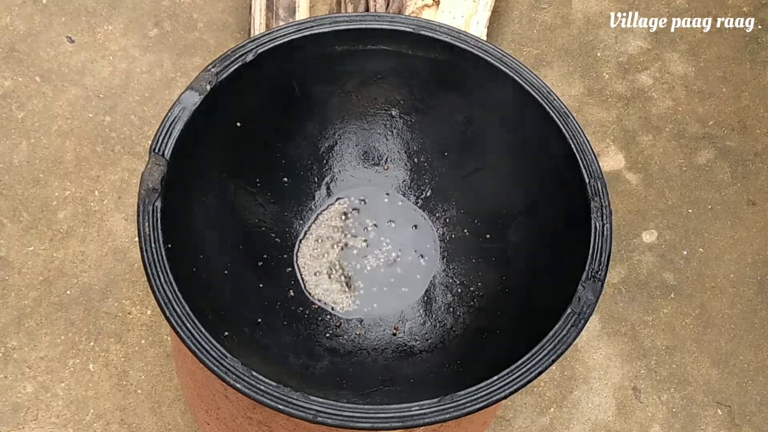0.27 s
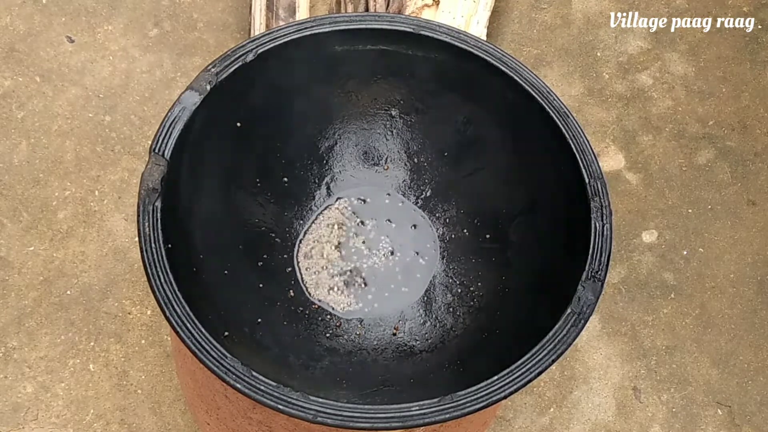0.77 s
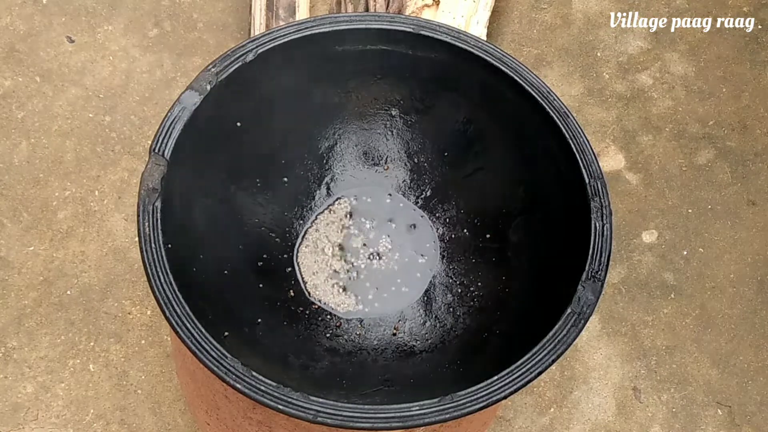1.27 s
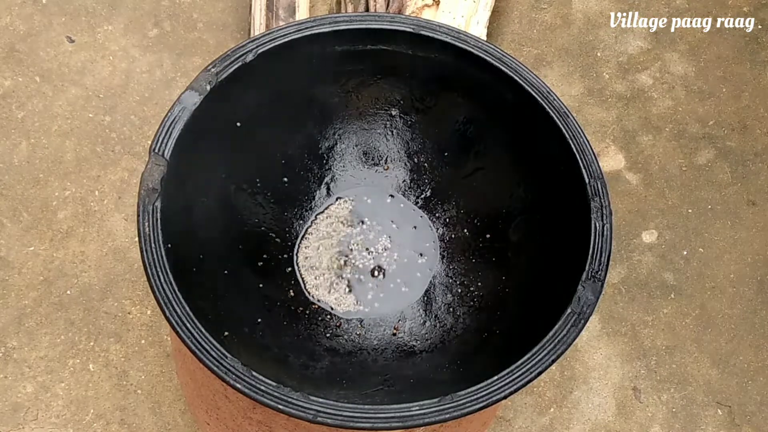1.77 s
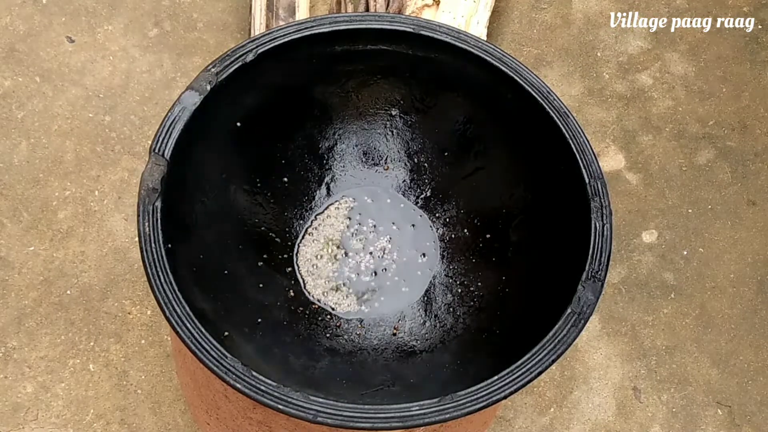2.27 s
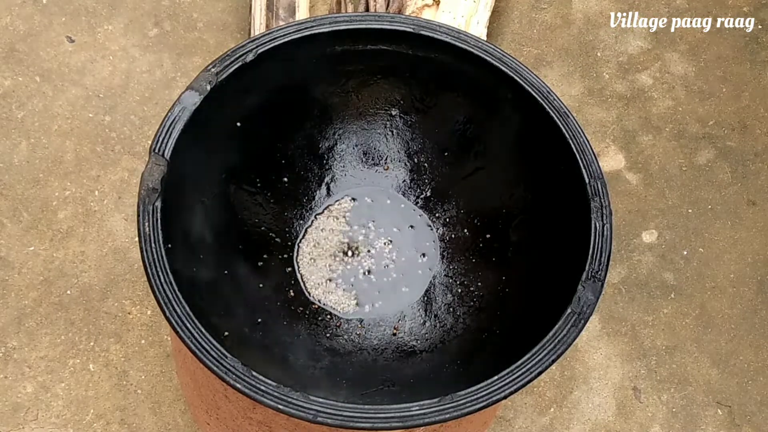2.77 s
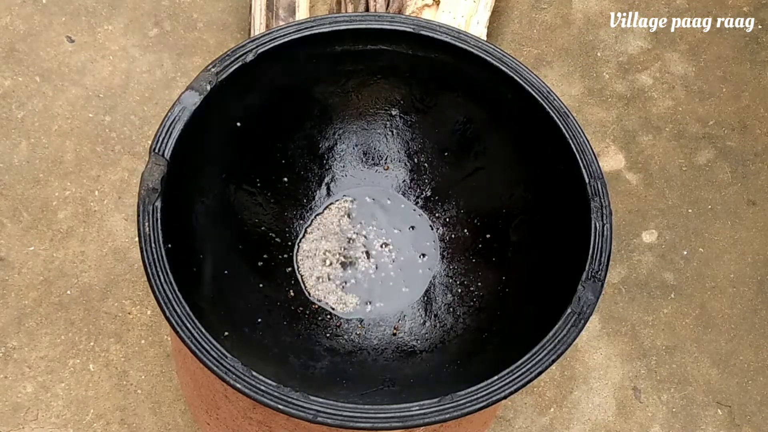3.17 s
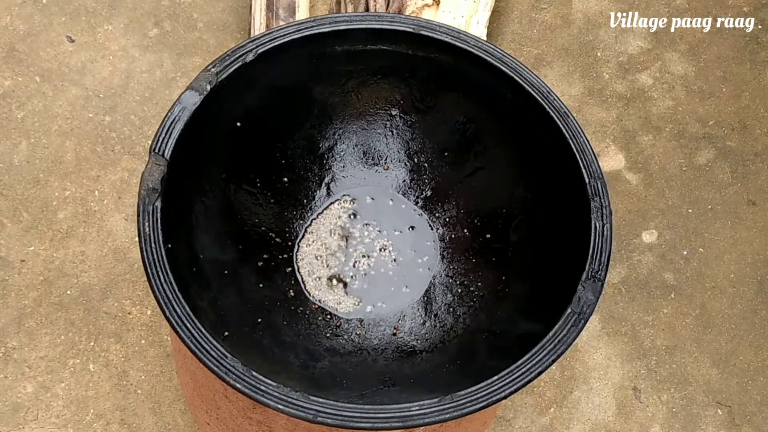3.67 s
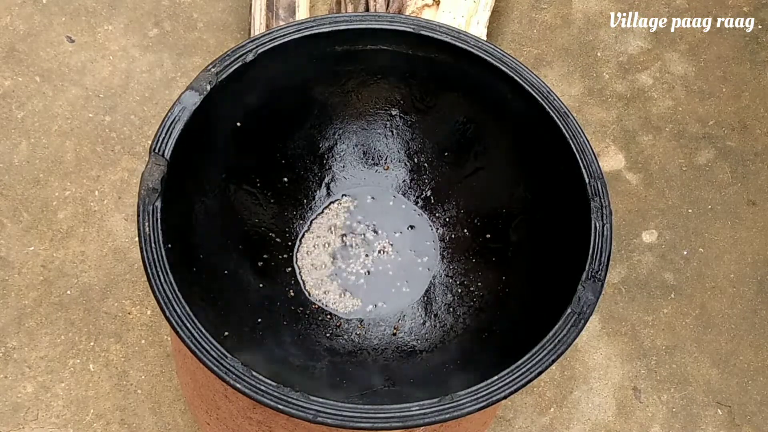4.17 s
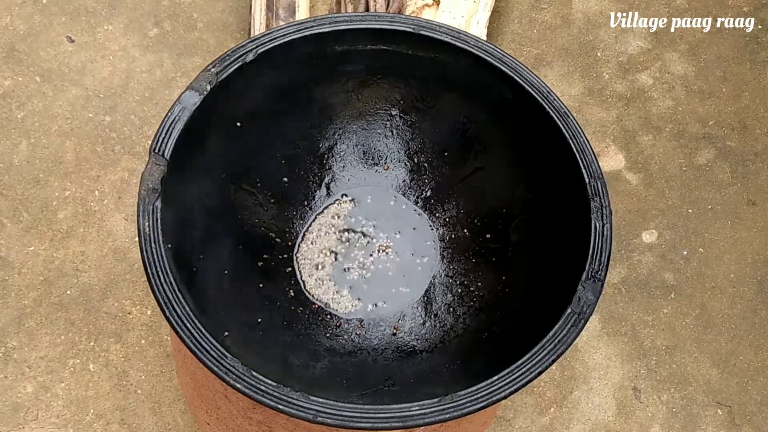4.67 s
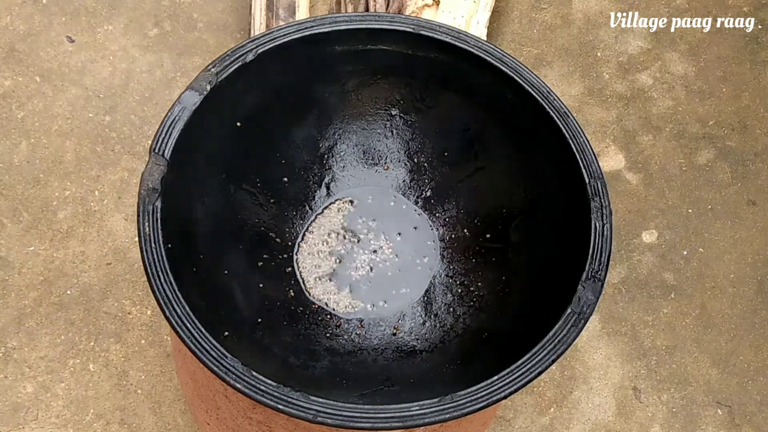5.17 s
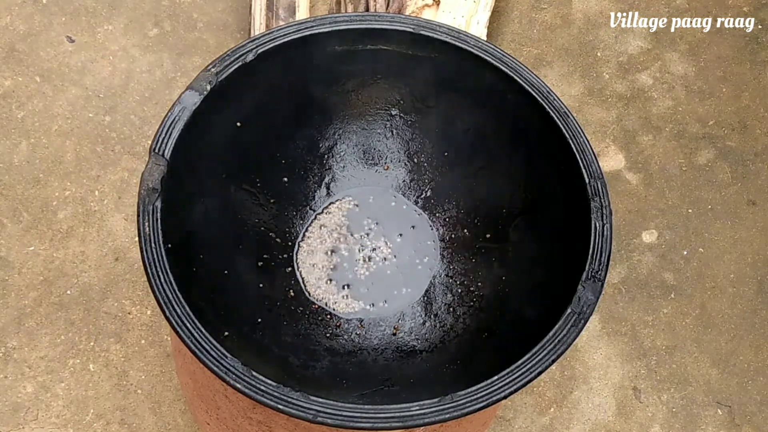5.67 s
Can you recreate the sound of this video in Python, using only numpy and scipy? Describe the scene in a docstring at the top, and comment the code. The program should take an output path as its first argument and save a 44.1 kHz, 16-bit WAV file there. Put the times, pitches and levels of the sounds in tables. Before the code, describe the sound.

Outdoors, with stereo microphones close above a deep iron pan, seeds burst in hot oil. A very quiet, airy high hiss of oil flickers throughout over soft low rumble and a faint, slightly wavering distant motor hum. A sharp pop comes almost at once, a small one follows, then a tight cluster at 0.5 s and one near 0.8 s. From 1.2 to 1.65 s brighter, stronger snaps crowd irregularly. After a gap, three burst around 2.3-2.4 s, a pair at 2.9 s, and an especially loud ringing one at 3.1 s. Another strong pop lands near 3.9 s amid weaker ones. Each burst is only milliseconds long, a dry crack with a short hollow metallic ping around 2-3 kHz and a diffuse yard tail. Tiny ticks fall between. Weaker pops continue to 4.6 s, then just a faint tick at 5.05 s and a small pop at 5.8 s.

```python
"""Oil hisses in an iron pan from the start (coloured noise), over soft outdoor rumble and distant motor hum.
Seeds soon burst in the oil, singly and in clusters: a noise puff rings the pan's hollow and wall as damped
modes, a snap with a bowl echo gives the crack, and noise tails return it from the yard.
From about 1 s, small ticks and thumps (decaying cosines) fall among the bursts; bursts get sparse towards the end.
Two microphone ports above the pan each add their own colour."""
import sys
import numpy as np
from scipy import signal
from scipy.fft import rfft, irfft
from scipy.io import wavfile
from scipy.ndimage import uniform_filter1d

SR = 44100
rng = np.random.default_rng(int(sys.argv[2]) if len(sys.argv) > 2 else 0)


def waveform_to_disk(signal):
    """Save audio, clipped to [-1, 1], as 16-bit WAV at the path in sys.argv[1]."""
    frames = np.transpose(np.atleast_2d(signal))
    scaled = np.clip(frames, -1, 1) * 32767
    samples = np.round(scaled).astype(np.int16)
    wavfile.write(sys.argv[1], SR, samples)


N = 261513

# oil hiss level: start_s, level_db
HISS_LEVEL = [(0.0, -61.5), (0.7, -65.5), (1.46, -59.5), (1.86, -63), (2.84, -63), (3.09, -60), (3.6, -64),
              (5.93, -64.5)]
# oil hiss spectrum: freq_hz, density_db_per_hz
HISS_SPECTRUM = [(1200, -13.5), (2500, -10.5), (7000, -8), (9000, -4), (11500, -1.5), (14000, -3),
                 (14500, -42)]
# outdoor rumble spectrum: freq_hz, density_db_per_hz
AIR_SPECTRUM = [(10, -13.5), (25, 8), (95, -1), (200, -12), (400, -7), (550, -14.5), (1200, -27),
                (3900, -51)]
# likeness of left and right rumble: freq_hz, likeness_0_to_1
AIR_LIKENESS = [(100, 0.9), (290, 0.7), (1400, 0.4)]
# motor hum level: start_s, fundamental_db, second_harmonic_db
HUM_LEVEL = [(0.1, -60.5, -65), (0.7, -59, -68), (1.09, -59, -70), (1.34, -55, -64), (1.58, -65, -77.5),
             (1.73, -57, -65), (2.26, -63, -83.5), (2.61, -60, -72), (3.38, -65, -80), (3.7, -65, -75.5),
             (5.0, -66.5, -67), (5.93, -79.5, -68)]
# weak motor tones: multiple_of_shaft_speed, level_db
HUM_SIDE = [(2.5, -81), (3.75, -87), (4.5, -85.5), (6, -84.5), (7.5, -88)]
# bursting seeds, energy of each part: start_s, low_ring_db, low_pitch_hz, high_ring_db, knock_db,
# knock_pitch_hz, crack_db, crack_top_db, crack_left_minus_right_db, length_ms
BURSTS = [(0.0677, -21.5, 2020, -9, -13, 3360, -14, -32, 0, 1.25),
          (0.1594, -38, 2200, -25, -15, 4500, -20, -10, -3, 0.77),
          (0.496, -28, 2320, -10, -14.5, 3580, -22.5, -49, 3, 4.2),
          (0.5095, -20, 2300, -15, -23, 3520, -36, -35, 0, 7.2),
          (0.519, -24, 2310, -13.5, -18, 3730, -28, -27, -1, 7.7),
          (0.7975, -28, 2350, -14, -23.5, 3800, -30.5, -35, 0, 4.7),
          (1.0001, -34.5, 2300, -32, -26, 3450, -41, -53, 0, 5.5),
          (1.199, -14, 2050, -5, -9, 4080, -7, -3, 6.5, 2.06),
          (1.3388, -30, 2160, -14.5, -17, 3900, -23, -23, 5, 5.2),
          (1.403, -13, 2050, -7.5, -13.5, 3370, -7.5, -37, -3, 5.4),
          (1.4166, -31, 2250, -25, -25, 4200, -22, -35, 10, 6),
          (1.4226, -23, 2250, -26, -18.5, 4600, -26, -42, 7, 2.7),
          (1.567, -21.5, 2250, -16, -14, 3650, -20.5, -40, 2, 7),
          (1.649, -8.5, 2130, -7.5, -13, 3830, -7.5, -32, -3, 3.7),
          (2.3235, -11.5, 2150, -5.5, -12.5, 4400, -10.5, -45, 3.5, 1.65),
          (2.395, -9, 2230, -7, -11.5, 4640, -13.5, -21, 4, 3.3),
          (2.4154, -16.5, 2110, -11, -12.5, 4000, -21.5, -26, 0, 0.69),
          (2.8913, -7.5, 2180, -9, -12.5, 4260, -15.5, -43, -4, 4.9),
          (2.904, -15, 2170, -5.5, -12, 3250, -20.5, -21, 8, 4.9),
          (3.1, -6, 2240, -3.5, -12, 3860, -10.5, -15.5, 1, 4.8),
          (3.218, -23.5, 2090, -17, -23, 3450, -31.5, -48, 0, 2.6),
          (3.61, -34.5, 2180, -17.5, -20.5, 3270, -25.5, -57, -7, 2.1),
          (3.783, -39, 2250, -24.5, -21, 4730, -16, -19, 3, 2.9),
          (3.8891, -16.5, 2000, -3, -11, 3470, -18, -16.5, 2, 3.5),
          (4.1504, -29, 2240, -21, -19, 3780, -32.5, -60.5, -13, 5.1),
          (4.167, -20.5, 2020, -31, -33, 4200, -48, -54, 0, 7.8),
          (4.398, -32.5, 2240, -36, -20.5, 5160, -27, -23, -4, 7.1),
          (4.4672, -28, 2240, -15, -19, 3380, -29, -29, 2, 5),
          (4.612, -38, 2170, -34, -19.5, 4900, -21.5, -38, -6, 5.1),
          (5.0497, -61, 2210, -72, -47.5, 5200, -32, -19.5, -9.5, 3.6),
          (5.8309, -27.5, 2250, -36, -16.5, 3400, -22, -57, 0.5, 6)]
# low modes of the pan's hollow: pitch_hz, level_db, t60_s
LOW_HOLLOW_MODES = [(2124, 1.5, 0.027), (2225, 0, 0.053), (2550, 1, 0.022)]
# high modes of the pan's hollow: pitch_hz, level_db, t60_s
HIGH_HOLLOW_MODES = [(2703, 0, 0.016)]
# modes of the pan's iron wall: pitch_hz, level_db, t60_s
WALL_MODES = [(3320, 0, .014), (3850, -1, .009), (4530, -1, .009), (5400, 0, .006)]
# yard return of low ring, high ring, knock, crack (one row each): return_db, t60_s
YARD_RETURNS = [(-7.5, 0.35), (-22, 0.79), (-10.5, 0.2), (-18, 0.36)]
# brief damped swings, ticks and thumps (40 Hz row: low thump under a burst): start_s, level_db, pitch_hz, t60_s
TICKS_AND_THUMPS = [(1.0225, -47.5, 2670, 0.023), (1.0761, -42.5, 2680, 0.02), (1.198, -36.5, 40, 0.0099),
                    (1.5173, -27, 9500, 0.0038), (2.227, -37.5, 1090, 0.0026), (4.074, -42.5, 3830, .003),
                    (4.517, -40, 4400, .004)]
# peaks and dips of the left and the right port: centre_hz, width_hz, gain_db
PORT_COLOUR = [
    [(9270, 1780, 9), (11000, 12400, -5)],
    [(7975, 1200, 9), (11000, 9000, -7)],
]

AIR_DB = -65
MOTOR_HZ, MOTOR_WANDER = 75.3, 0.0013  # wander as a share of speed
THIRD_RE_FIRST_DB, FIFTH_DB = -16, -78.5
OVERTONE_WAVER_DB, SIDE_WAVER_DB = 1.6, 1.77
BURST_SAMPLES, TAIL_SAMPLES = 2048, 14000
LOW_REACH, KNOCK_REACH = 0.023, 0.078  # spread of driven modes, as a share of favoured pitch
MODE_SPREAD, MODE_SPREAD_DB = 0.009, 2.5  # chance in pitch (share) and strength
PUFF_SHARE, RISE_SHARE = 0.7, 1  # decay and swell of puff over burst length
SNAP_SHARE = 0.038  # decay of snap over burst length
BOWL_ECHO_MS, BOWL_ECHO_DB = 1.1, -8
SPLASH_DB, SPLASH_DECAY_MS = -14.5, 3.14
THUD_DB = -14  # re low ring and crack together
CRACK_TOP_HZ = 13700
RING_LAG_SAMPLES, CRACK_LAG_SAMPLES = 3, 4  # left after right
YARD_GAP_S, YARD_BLUR_HZ, YARD_DELAY_SAMPLES, YARD_TOP_HZ = 0.003, 800, 96, 14200
PATCHY_DB, PATCH_S = 2.2, 0.006
THUMP_RISE_S = 0.0006
TOP_HZ = 15540


def undb(db):
    """Gain of a dB value."""
    return 10 ** (np.asarray(db) / 20)


def unit(x):
    """Scale to rms 1."""
    return x / np.sqrt(np.mean(x ** 2))


def energy(x, db):
    """Scale a short two-channel sound to a mean energy per channel."""
    return x * undb(db) / np.sqrt(np.sum(x ** 2) / 2)


def decay(t_s, t60_s):
    """Exponential fall of 60 dB in t60_s."""
    return np.exp(-np.log(1000) * t_s / t60_s)


def band(x, lo_hz, hi_hz, order=2):
    """Butterworth band-pass."""
    return signal.sosfilt(signal.butter(order, [lo_hz, hi_hz], "bandpass", fs=SR, output="sos"), x)


def low_pass(x, order, stop_db, top_hz):
    """Steep elliptic low-pass."""
    return signal.sosfilt(signal.ellip(order, .2, stop_db, top_hz, fs=SR, output="sos"), x)


def by_log_hz(points):
    """Curve over log frequency, one value per spectrum bin."""
    bins_hz = np.arange(1, N // 2 + 2) * SR / N
    hz, value = np.transpose(points)
    return np.interp(np.log(bins_hz), np.log(hz), value)


def coloured(points, channels):
    """Gaussian noise with a given spectrum."""
    white = rng.standard_normal((channels, N))
    return irfft(rfft(white) * undb(by_log_hz(points)), N)


def walk(rate_hz):
    """Smooth random curve: levels held 1 / rate_hz s, averaged twice over that time."""
    hold = int(SR / rate_hz)
    steps = np.repeat(rng.standard_normal(N // hold + 1), hold)
    return uniform_filter1d(uniform_filter1d(steps, hold), hold)[:N]


def curves(table):
    """Columns of a time table, sample by sample."""
    start_s, *columns = np.transpose(table)
    return [np.interp(np.arange(N) / SR, start_s, column) for column in columns]


def oil():
    """Tiny steam bubbles: fine noise, grainy per channel, flickering in common."""
    grain_db = 1.55 * np.array([walk(350), walk(250)])
    flicker_db = 1.5 * walk(25)
    level_db = curves(HISS_LEVEL)[0] + flicker_db + grain_db
    return unit(coloured(HISS_SPECTRUM, channels=2)) * undb(level_db)


def air():
    """Outdoor rumble: noise most alike left and right in the bass, less so above."""
    alike = np.clip(by_log_hz(AIR_LIKENESS), 0, 1)
    mid, side = rfft(coloured(AIR_SPECTRUM, channels=2))
    both = np.sqrt(1 + alike) * mid + np.sqrt(1 - alike) * side * np.array([[1], [-1]])
    return unit(irfft(both, N)) * undb(AIR_DB)


def motor():
    """Sines locked to one slightly wandering shaft speed, each wavering in level."""
    turn = 2 * np.pi * np.cumsum(MOTOR_HZ * (1 + MOTOR_WANDER * walk(2))) / SR
    first_db, second_db = curves(HUM_LEVEL)
    hum = undb(first_db + 1.5 * walk(1.2)) * np.sin(turn)
    hum += undb(second_db + 0.63 * walk(6)) * np.sin(2 * turn)
    for multiple, level_db in ((3, first_db + THIRD_RE_FIRST_DB), (5, FIFTH_DB)):
        hum += undb(level_db + OVERTONE_WAVER_DB * walk(3.3)) * np.sin(multiple * turn)
    for multiple, level_db in HUM_SIDE:
        phase = rng.uniform(0, 2 * np.pi)
        hum += undb(level_db + SIDE_WAVER_DB * walk(3.4)) * np.sin(multiple * turn + phase)
    return np.sqrt(2) * hum  # levels are rms


def seeds():
    """Steam bursts the seeds; each burst is heard direct and as a yard tail."""
    near, far = np.zeros((2, 2, N + BURST_SAMPLES + TAIL_SAMPLES))
    chance = rng.standard_normal((len(BURSTS), 9, TAIL_SAMPLES))
    for (start_s, *row), noise in zip(BURSTS, chance):
        parts = burst(*row, noise[3:, :BURST_SAMPLES])
        at = int(start_s * SR)
        near[:, at:at + BURST_SAMPLES] += parts.sum(axis=0)
        far[:, at:at + BURST_SAMPLES + TAIL_SAMPLES - 1] += yard(parts[1:], noise[:3])  # no thud
    return (near + low_pass(far, 6, 60, YARD_TOP_HZ))[:, :N]


def burst(low_db, low_hz, high_db, knock_db, knock_hz, crack_db, top_db, pan_db, length_ms, noise):
    """A ragged puff of steam drives hollow and iron; a snap with its echo gives the treble."""
    ms = np.arange(noise.shape[1]) / SR * 1000
    place = noise[5].reshape(4, -1, 2)  # chance (pitch, strength) per mode
    swell = 1 - np.exp(-ms / (RISE_SHARE * length_ms))
    shape = np.exp(-(ms / (PUFF_SHARE * length_ms)) ** 2) * swell
    puff = (noise[0] + 0.3 * noise[1:3]) * shape
    rough = (noise[0] + 0.9 * noise[1:3]) * shape
    puff[:, 0] += 47.0 / length_ms  # onset click

    snap = (noise[0] + noise[3:5]) * np.exp(-ms / (SNAP_SHARE * length_ms))
    snap[:, :2] += np.array([[4.1, 0.94], [0.87, 3.2]]) / length_ms
    # far side of the bowl returns the snap with sides swapped
    late = int(BOWL_ECHO_MS * SR / 1000)
    snap[:, late:] += undb(BOWL_ECHO_DB) * snap[::-1, :-late]
    # patter of thrown droplets
    snap += undb(SPLASH_DB) * noise[1:3] * np.exp(-ms / SPLASH_DECAY_MS)

    thud_db = THUD_DB + 10 * np.log10(undb(2 * low_db) + undb(2 * crack_db))
    thud = energy(band(snap, 1400, 2230, order=1), thud_db)
    low = ring(puff, favour(LOW_HOLLOW_MODES, low_hz, LOW_REACH), place[0])
    low = energy(band(low, 1723, 2910, order=4), low_db)
    high = energy(band(ring(puff, HIGH_HOLLOW_MODES, place[1]), 2380, 3220), high_db)
    wall = ring(rough, favour(WALL_MODES, knock_hz, KNOCK_REACH), place[2])
    wall = wall + 25 * band(rough, 0.66 * knock_hz, 1.22 * knock_hz, order=1)
    knock = energy(band(wall, 3000, 6900), knock_db)
    crack = energy(band(snap, 5600, 10480), crack_db)
    crack = crack + energy(band(snap, 10350, CRACK_TOP_HZ, order=4), top_db)
    crack = crack * undb(np.array([[pan_db], [-pan_db]]) / 2)

    parts = np.array([thud, low, high, knock, crack])
    # right port is nearer to the pan
    parts[:-1, 0] = np.roll(parts[:-1, 0], RING_LAG_SAMPLES, axis=1)
    parts[-1, 0] = np.roll(parts[-1, 0], CRACK_LAG_SAMPLES)
    return parts


def favour(modes, favoured_hz, reach):
    """A seed's place decides which modes it drives: those nearest favoured_hz most."""
    return [(hz, db - min((np.log(hz / favoured_hz) / reach) ** 2, 18), t60_s) for hz, db, t60_s in modes]


def ring(x, modes, chance):
    """Damped modes; the seed's place shifts their strength and pitch a little."""
    out = 0
    for (hz, db, t60_s), (detune, strength) in zip(modes, chance):
        turn = 2j * np.pi * hz * (1 + MODE_SPREAD * detune) / SR
        pole = np.exp(turn - np.log(1000) / (t60_s * SR))
        out = out + undb(db + MODE_SPREAD_DB * strength) * signal.lfilter([1], [1, -pole], x).imag
    return out


def yard(parts, noise):
    """Ground and walls scatter each part into a diffuse tail, unlike left and right, new per seed."""
    t_s = np.arange(noise.shape[1]) / SR
    # returns come in uneven clumps
    clumps = unit(uniform_filter1d(noise[0], int(PATCH_S * SR)))
    scatter = noise[1:] * undb(PATCHY_DB * clumps) * (t_s > YARD_GAP_S)
    tails = [energy(scatter * decay(t_s, t60_s), db) for db, t60_s in YARD_RETURNS]
    # keep only the broad colour of each part
    blur_bins = int(YARD_BLUR_HZ * parts.shape[2] / SR)
    broad = np.sqrt(np.abs(uniform_filter1d(np.abs(rfft(parts)) ** 2, blur_bins)))
    sent = np.roll(irfft(broad), YARD_DELAY_SAMPLES, axis=2)
    # narrow the two rings to what lingers
    sent[0] = band(sent[0], 2130, 2450)
    sent[1] = band(sent[1], 2500, 2950, order=1)
    return signal.fftconvolve(sent, tails, axes=2).sum(axis=0)


def thumps():
    """Brief damped swings, heard as ticks and thumps, a little late on the left."""
    out = np.zeros(N)
    for start_s, level_db, pitch_hz, t60_s in TICKS_AND_THUMPS:
        t_s = np.arange(N) / SR - start_s
        rise = np.clip(t_s / THUMP_RISE_S, 0, 1)  # silent before start_s
        out += undb(level_db) * rise * np.cos(2 * np.pi * pitch_hz * t_s) * decay(np.abs(t_s), t60_s)
    return band([np.roll(out, RING_LAG_SAMPLES), out], 20, 13000, order=1)


def scene():
    """Oil, yard, motor and pan together."""
    return oil() + air() + motor() + seeds() + thumps()


def record(dry):
    """Each microphone port adds its own peaks and dips; the top is cut."""
    ports = []
    for x, colour in zip(dry, PORT_COLOUR):
        heard = x.copy()
        for centre_hz, width_hz, gain_db in colour:
            part = band(x, centre_hz - width_hz / 2, centre_hz + width_hz / 2, order=1)
            heard += (undb(gain_db) - 1) * part
        ports.append(heard)
    return low_pass(ports, 12, 70, TOP_HZ)


dry = scene()
out = record(dry)
waveform_to_disk(out)
```